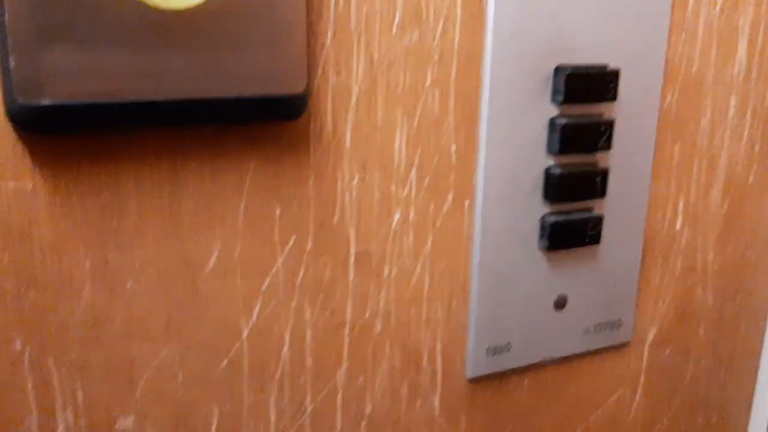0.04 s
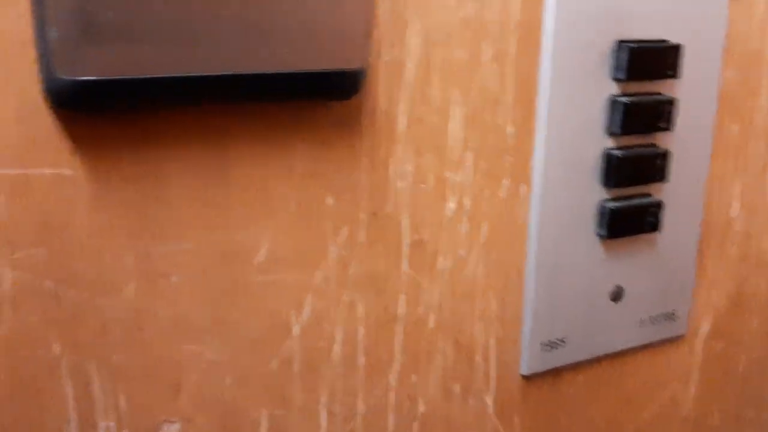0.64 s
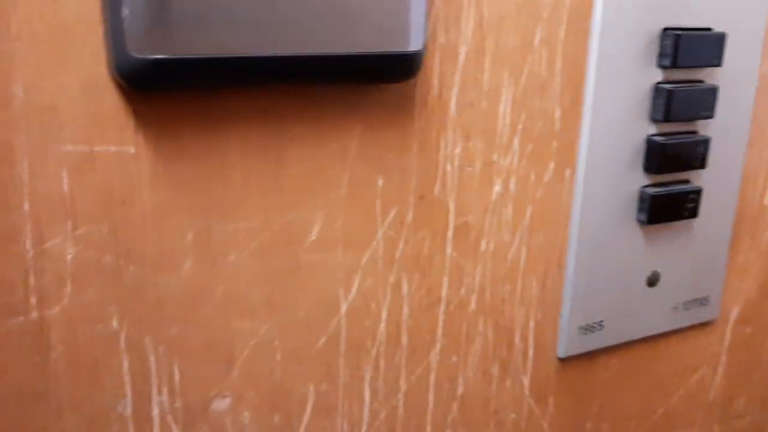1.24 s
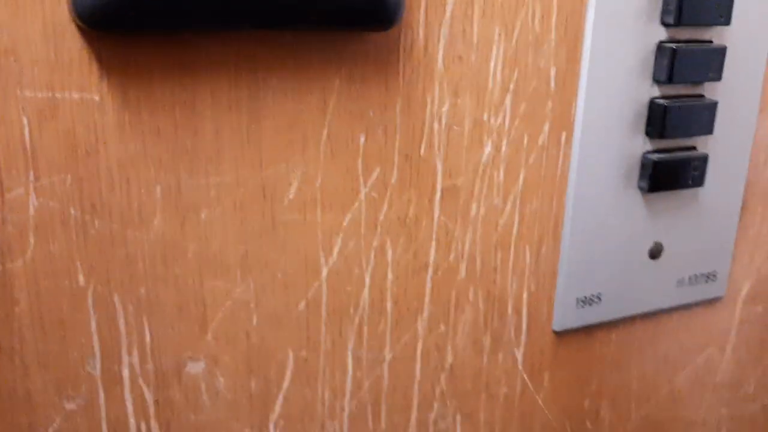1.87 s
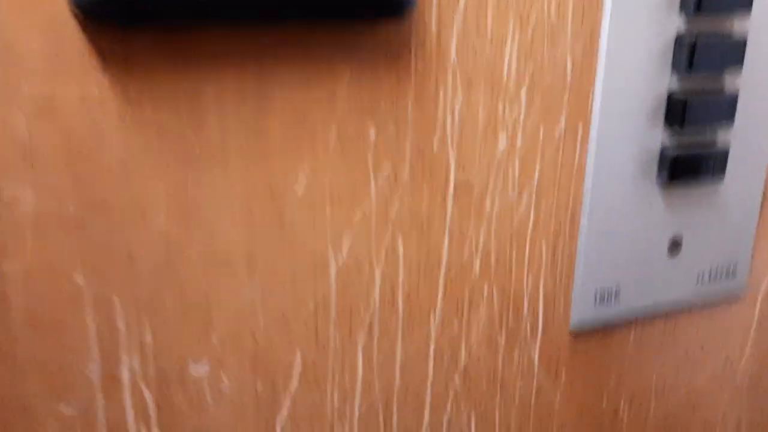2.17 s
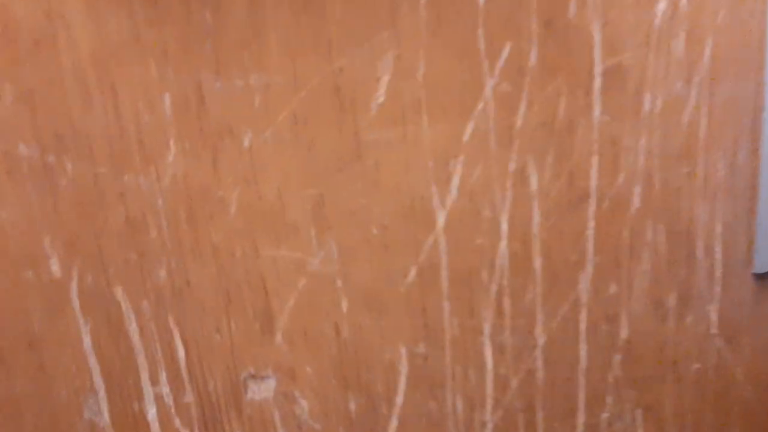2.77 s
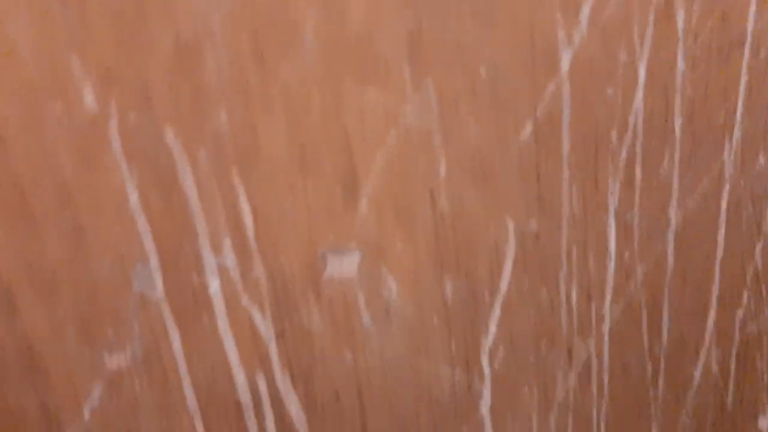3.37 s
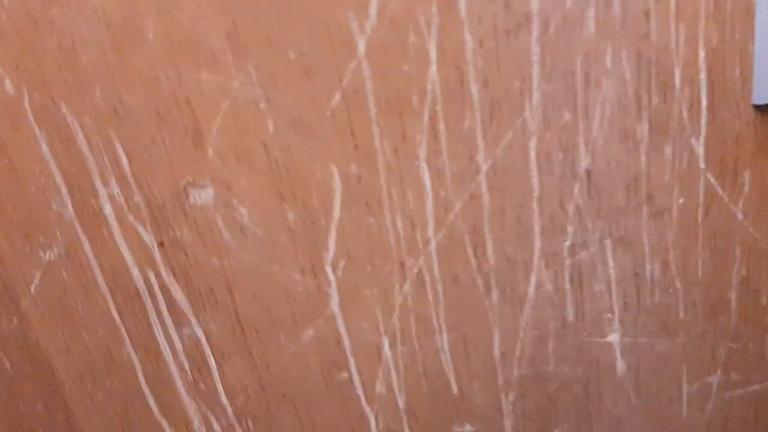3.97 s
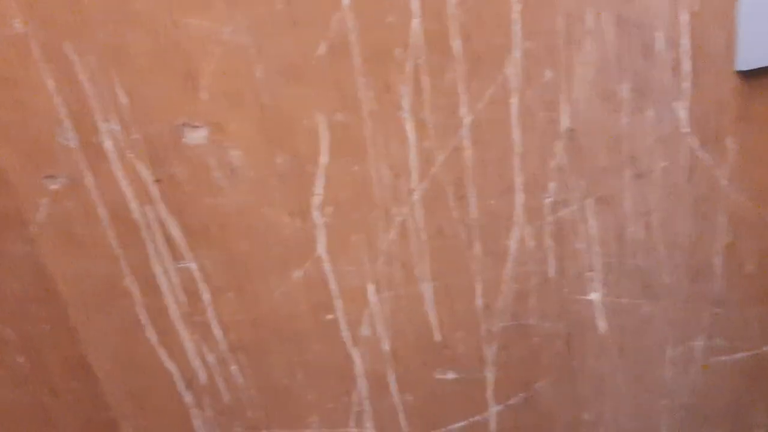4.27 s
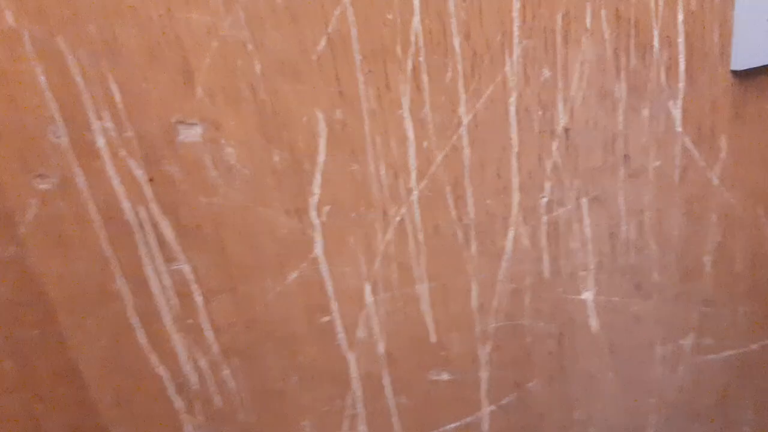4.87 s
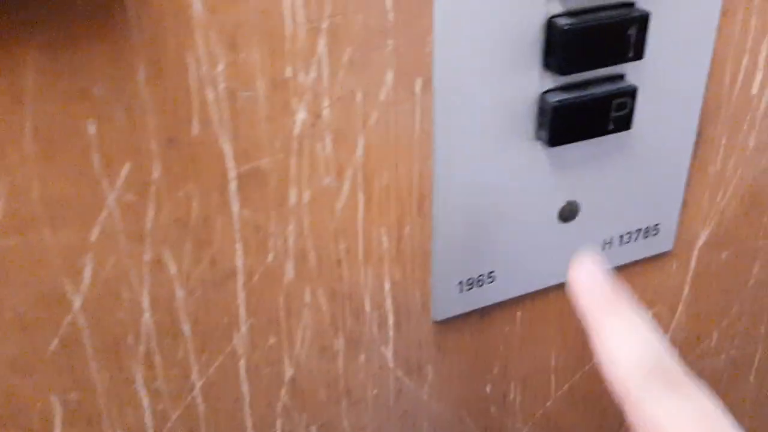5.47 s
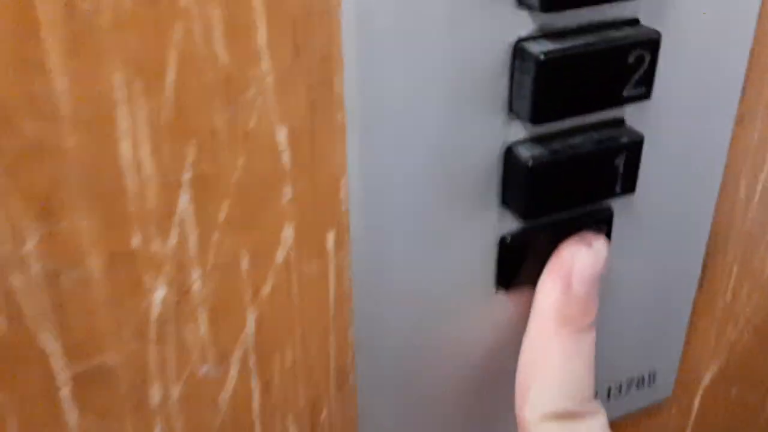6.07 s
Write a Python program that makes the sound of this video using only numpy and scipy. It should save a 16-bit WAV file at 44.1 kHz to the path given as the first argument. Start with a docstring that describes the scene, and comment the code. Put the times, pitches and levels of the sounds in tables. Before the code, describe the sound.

An old elevator hums and rumbles, then slams and thumps to a stop with metallic clicks, before a stiff button snaps.

```python
"""An old wood-panelled traction lift rides on the deep, beating hum of its machine, with a gear whine,
a rolling rumble and the hiss of its guide shoes. A lever scrapes and slams; the car thumps, bounces on
its ropes and slows, and steel latches click as it comes to rest, rubbing and groaning.
In the quiet a finger snaps a stiff floor button. Each blow is a tick, a clatter, a cabin echo and the
ring of the struck object; each rub is coloured noise combed by the cabin."""
import sys
import numpy as np
from scipy import signal
from scipy.fft import rfft, irfft
from scipy.io import wavfile
from scipy.ndimage import uniform_filter1d

SR = 44100
rng = np.random.default_rng(int(sys.argv[2]) if len(sys.argv) > 2 else 0)


def transcribe(u):
    """Save the signal u as a 16-bit wav file named by the first command-line argument.

    u: samples, shape (n,) or (channels, n), limited to [-1, 1]; the rate is SR.
    q: integer samples, one column per channel.
    """
    v = np.clip(np.atleast_2d(u).T, -1, 1)
    q = np.round(v * 32767).astype(np.int16)
    wavfile.write(sys.argv[1], SR, q)


N = 270333
TIME = np.arange(N) / SR
RING_TIME = TIME[:SR]  # one second for a blow to ring out


def amp(db):
    """Decibels to gain."""
    return 10 ** (np.asarray(db) / 20)


def unit_rms(x):
    """Scales to unit rms."""
    return x / np.sqrt(np.mean(x ** 2) + 1e-20)


def at_hz(points, hz):
    """Reads a table on a log-frequency axis."""
    freqs, values = np.transpose(points)
    return np.interp(np.log(hz + 1), np.log(freqs + 1), values)


def automation(points):
    """Draws a (time, value) table along the scene."""
    return np.interp(TIME, *np.transpose(points))


def add(mix, start, sound):
    """Mixes a sound in at start seconds."""
    part = mix[:, round(start * SR):][:, :sound.shape[-1]]
    part += sound[..., :part.shape[-1]]


def equalise(x, eq, size=8192):
    """Minimum-phase filter with the given (Hz, dB) shape."""
    log_gain = np.log(amp(at_hz(eq, abs(np.fft.fftfreq(size, 1 / SR)))))
    response = np.exp(np.conj(signal.hilbert(log_gain)))
    taps = np.fft.ifft(response).real[:size // 2]
    return signal.fftconvolve(x, taps[None], axes=1)[:, :x.shape[1]]


def wander(rate_hz):
    """Smooth random modulation of unit rms."""
    low_pass = np.exp(-(np.fft.rfftfreq(N, 1 / SR) / rate_hz) ** 2)
    return unit_rms(irfft(rfft(rng.standard_normal(N)) * low_pass, N))


def decay(t60):
    """Envelope that falls 60 dB in t60 seconds."""
    return np.exp(-np.log(1000) * RING_TIME / t60)


def onset(rise):
    """Fade-in with a time constant of rise seconds."""
    return 1 - np.exp(-RING_TIME / rise)


def swells(cues, attack, fade_db):
    """Gain of cues that build in attack seconds, hold for their length, then lose fade_db a second."""
    power = np.zeros(N)
    for start, length, db in cues:
        age = np.maximum(TIME - start, 0)
        held = amp(db - fade_db * np.maximum(age - length, 0))
        power += ((1 - np.exp(-age / attack)) * held) ** 2
    return np.sqrt(power)


# stereo width in the cabin: (frequency [Hz], side over mid [dB])
WIDTH = [(60, -26.5), (110, -18), (170, -10), (300, -7), (550, -5), (1000, 1.5), (2000, 0), (4000, -0.5),
         (12000, 0)]


def stereo(mid_side, left_db):
    """Bass is alike in both ears, treble arrives from all walls."""
    mid, side = mid_side
    side = irfft(rfft(side) * amp(at_hz(WIDTH, np.fft.rfftfreq(N, 1 / SR))), N)
    return np.array([(mid + side) * amp(left_db / 2), (mid - side) * amp(-left_db / 2)])


# reverb time of the cabin: (frequency [Hz], t60 [s])
CABIN_DECAY = [(100, 0.48), (260, 0.9), (700, 0.68), (1800, 0.52), (4800, 0.6), (12000, 0.11)]


def reflections():
    """Dense echoes between the cabin walls, each band dying at its own speed."""
    hz, t, bands = signal.stft(rng.standard_normal((2, SR)), SR, nperseg=256)
    fade = amp(-60 * t / at_hz(CABIN_DECAY, hz)[:, None])
    return signal.istft(bands * fade, SR)[1][:, :SR]


def ring(modes, rise):
    """Damped modes swell as a blow spreads through the object; mid and side are a quarter cycle apart."""
    side_shift = np.array([[0], [np.pi / 2]])
    tone = np.zeros((2, SR))
    for hz, db, t60 in modes:
        phase = 2 * np.pi * (hz * RING_TIME + rng.random()) + side_shift * rng.choice([-1, 1])
        tone += amp(db) * decay(t60) * np.sin(phase)
    return tone * onset(rise)


def contact_eq(db, centre_hz, below_db, above_db):
    """EQ of a blow: octave level peaks at the centre and falls by below_db and above_db an octave."""
    hz = np.array([20, centre_hz, SR / 2])
    octaves = np.log2(hz / centre_hz)
    octave_db = db + np.minimum(below_db * octaves, -above_db * octaves)
    white_to_pink_db = 10 * np.log10(SR / (2 * np.log(2) * hz))
    return np.transpose([hz, octave_db + white_to_pink_db])


def blows(hits, modes, rise, slopes_db, tick_db, grain_db, cabin_db, left_db):
    """Each blow is a sharp tick, a clatter of loose parts, a cabin echo and the struck object's ring."""
    out = np.zeros((2, N))
    for start, db, centre_hz, t60, ring_db in hits:
        roughness = unit_rms(uniform_filter1d(rng.standard_normal(SR), size=30))
        grains = unit_rms(amp(grain_db * roughness))
        clatter = rng.standard_normal((2, SR)) * grains * decay(t60) * onset(rise)
        clatter[0, 0] += amp(tick_db)
        echo = amp(cabin_db) * reflections() * onset(0.012)
        impact = equalise(clatter + echo, contact_eq(db, centre_hz, *slopes_db))
        add(out, start, impact + amp(ring_db) * ring(modes, 2 * rise))
    return stereo(out, left_db)


def friction(gain, eq, flutter_db, flutter_hz, left_db):
    """Uneven rubbing, heard partly direct and partly combed by the cabin's standing waves."""
    force = rng.standard_normal(N + SR)
    walls = reflections() * decay(0.3)
    combed = unit_rms(signal.fftconvolve(force[None], walls, axes=1)[:, SR:SR + N])
    direct = rng.standard_normal((2, N))
    sound = equalise(combed + direct, eq) * amp(flutter_db * wander(flutter_hz))
    sound = np.array([unit_rms(channel) for channel in sound])
    return stereo(sound * gain, left_db)


# tone of the quiet bed: (frequency [Hz], relative level [dB])
FLOOR_EQ = [(30, -14.5), (60, 1), (110, -2.5), (200, -19.5), (400, -28), (1000, -34.5), (2000, -34.5),
            (3500, -40), (5200, -38.5), (9000, -50.5), (12000, -36.5), (15500, -39)]


def noise_floor(level_db=-68):
    """A faint, steady, bass-heavy bed of noise."""
    noise = equalise(rng.standard_normal((2, N)), FLOOR_EQ)
    return amp(level_db) * unit_rms(stereo(noise, left_db=1))


# cues for the car's shudders, sways and groans: (start [s], length [s], level [dB])
SHUDDERS = [(1.65, .08, -29.5), (1.74, 0.034, -16.5), (1.885, 0.031, -22.5), (3.15, 0.22, -48.5),
            (3.68, 0.11, -39), (4.05, .2, -49.5), (5.85, .03, -42)]
SWAYS = [(3.25, .4, -52), (3.72, 0.13, -51), (4.2, 0.055, -50), (5.0, 0.083, -58), (5.38, 0.065, -54.5),
         (5.88, 0.1, -48)]
GROANS = [(3.51, 0.012, -51.5), (3.6, 0.11, -46.5), (3.69, 0.06, -43.5)]
# tone of each: (frequency [Hz], relative level [dB])
SHUDDER_EQ = [(25, -21.5), (45, 7.5), (65, 8.5), (80, -0.5), (100, 1), (122, -8.5), (150, -13), (180, -2),
              (230, -19), (275, -11.5), (310, -28.5), (400, -18), (900, -74)]
SWAY_EQ = [(25, -35), (40, 3.5), (52, -1), (64, 6), (90, -18), (200, -46)]
GROAN_EQ = [(150, -44), (300, 7.5), (400, 1.5), (470, 7), (600, -25), (1200, -38)]


def car_settling():
    """The car body shudders, sways on its ropes once stopped and groans low as it settles."""
    shudder = friction(swells(SHUDDERS, attack=0.01, fade_db=85.5), SHUDDER_EQ,
                       flutter_db=0.17, flutter_hz=6, left_db=2)
    sway = friction(swells(SWAYS, attack=0.012, fade_db=50.5), SWAY_EQ,
                    flutter_db=5.5, flutter_hz=5, left_db=5)
    groan = friction(swells(GROANS, attack=0.01, fade_db=130), GROAN_EQ,
                     flutter_db=0, flutter_hz=40, left_db=1)
    return shudder + sway + groan


# cues for the guide shoes' rubbing and singing: (start [s], length [s], level [dB])
RUBS = [(1.87, 0.1, -44), (2.04, 0.42, -50), (2.5, 0.31, -61), (2.77, 0.11, -47), (3.05, .04, -45),
        (3.425, 0.026, -57.5), (3.55, 0.14, -66.5), (3.73, 0.13, -49.5), (4.04, 0.1, -59),
        (5.08, 0.23, -81)]
SINGS = [(3.42, 0.032, -65), (3.88, 0.13, -65), (4.08, 0.15, -72), (4.63, 0.036, -81), (5.07, 0.059, -73),
         (5.2, 0.13, -79)]
# tone of each: (frequency [Hz], relative level [dB])
RUB_EQ = [(100, 3.5), (250, 11.5), (450, 7.5), (700, -1.5), (1100, -4), (1550, -1), (1800, -8), (2060, 2.5),
          (2300, -5.5), (2700, -9), (3300, -15.5), (5200, -12), (7500, -22), (15000, -14)]
SING_EQ = [(1200, -59), (1750, -18), (1860, -3), (1950, -9), (2050, -2), (2150, -9.5), (2300, -23),
           (3200, -37), (4300, -20), (5300, -15.5), (6500, -23), (9000, -23)]


def shoe_rubs():
    """Guide shoes rub and sing thinly on their rails as the car creeps and settles."""
    rub = friction(swells(RUBS, attack=0.009, fade_db=107.5), RUB_EQ,
                   flutter_db=2.1, flutter_hz=35.53, left_db=1.5)
    sing = friction(swells(SINGS, attack=0.015, fade_db=57), SING_EQ,
                    flutter_db=1, flutter_hz=25.07, left_db=7)
    return rub + sing


# latch and contact hits, with the lever's release at 1.563 s among them: (time [s], octave level [dB], centre
# [Hz], clatter t60 [s], ring [dB])
LATCH_HITS = [(.523, -48, 10300, 0.13, -49), (1.052, -46.5, 8700, 0.27, -73),
              (1.225, -44.5, 4700, .55, -68), (1.563, -24.5, 1500, .06, -50),
              (1.885, -48.5, 12000, 0.39, -67), (2.704, -55, 11400, 0.35, -62),
              (2.76, -62, 3400, 0.33, -59), (2.999, -31, 7560, 0.18, -48), (3.040, -34, 5040, 0.14, -31.5),
              (3.698, -49, 13300, 0.39, -54.5), (3.954, -38, 5100, 0.11, -47),
              (4.121, -56.5, 7100, 0.14, -77), (5.268, -73, 5500, 0.14, -92)]
# ring of the steel: (frequency [Hz], level [dB], t60 [s])
LATCH_MODES = [(410, -6.5, .35), (1530, 0.5, .14), (1576, 0.5, 0.1), (1460, -23.5, 1), (1660, -23, 0.37),
               (1880, -1, 0.068), (2050, -4, .2), (2118, 6, .06), (2330, -5.5, 0.21), (2440, -5.5, 0.072),
               (3713, -19.5, .19), (5800, -23, .2), (7010, -19.5, 0.28)]


def latch_clicks():
    """Latches and contacts snap with a bright, steely ring; among them the lever releases at 1.563 s."""
    return blows(LATCH_HITS, LATCH_MODES, rise=0.0014, slopes_db=(5.5, 7),
                 tick_db=15, grain_db=3.5, cabin_db=-20, left_db=1.5)


# hits on button and wall: (time [s], octave level [dB], centre [Hz], clatter t60 [s], ring [dB])
BUTTON_HITS = [(5.8445, -23.5, 6900, .027, -64.5), (5.847, -18.5, 5440, 0.18, -46),
               (5.8517, -17.5, 5300, 0.13, -33), (5.8712, -15.5, 5900, 0.049, -52),
               (5.8737, -15.5, 7530, 0.015, -50)]
WALL_HITS = [(5.88, -31.5, 2500, 0.11, -26)]
# ring of the button plate and of the wood: (frequency [Hz], level [dB], t60 [s])
PLATE_MODES = [(626, 0, 0.39), (950, -9, 0.62), (1151, -9, 0.41), (1496, -2.5, 0.27), (2696, 1, 0.34),
               (2830, -7.5, .35), (3730, 7, 0.24), (3800, -1, 0.21), (3920, 6, 0.24), (4150, -7, 0.3),
               (4550, -4, 0.26), (4570, -6, 0.22), (5050, -3, 0.26), (5200, -5.5, .25), (5238, -6, .3),
               (6000, -13, 0.21), (6912, -15, 0.13), (7300, 3, .2)]
WALL_MODES = [(235, -4, 0.28), (276, -3.5, 0.22), (339, -11, 0.19), (360, -0.5, 0.13), (476, -13, 0.31)]


def floor_button():
    """The button snaps over and hits its stop; the finger shoves the wooden wall with it."""
    snap = blows(BUTTON_HITS, PLATE_MODES, rise=0.00019, slopes_db=(6, 1),
                 tick_db=10, grain_db=2.5, cabin_db=-15.5, left_db=2.5)
    shove = blows(WALL_HITS, WALL_MODES, rise=0.0019, slopes_db=(4.5, 5),
                  tick_db=2, grain_db=-11, cabin_db=-3.5, left_db=2)
    return snap + shove


# scrapes leading into the slam: (start [s], length [s], level [dB])
SCRAPES = [(1.582, 0.06, -26.5), (1.617, .07, -23.5)]
# tone of the scrape: (frequency [Hz], relative level [dB])
SCRAPE_EQ = [(80, -3.5), (190, 1), (280, -11), (420, 4.5), (650, -1), (1100, 0.5), (1700, -2), (2200, -3),
             (3000, -11.5), (5000, -5.5), (7500, -15.5), (15000, -10.5)]
# hits of the slam: (time [s], octave level [dB], centre [Hz], clatter t60 [s], ring [dB])
LEVER_HITS = [(1.626, -24.5, 2500, 0.095, -32.5), (1.711, -22, 1400, 0.14, -18.5),
              (1.724, -23.5, 9000, 0.14, -28.5)]
# ring of the lever and its bracket: (frequency [Hz], level [dB], t60 [s])
LEVER_MODES = [(391.6, -5.5, 0.28), (472.7, -1, 0.25), (494, 0.5, 0.44), (853, -6.5, 0.25),
               (973, -6.5, 0.22), (1741, -8.5, 0.41), (2052, -1, 0.19), (2179, -3.5, 0.19),
               (2256, -1, 0.063), (2430, -5, 0.073), (4188, -18, 0.23), (4580, -13.5, 0.18)]


def lever():
    """The lever scrapes, then slams home and rings with its bracket."""
    scrape = friction(swells(SCRAPES, attack=0.004, fade_db=237), SCRAPE_EQ,
                      flutter_db=0.5, flutter_hz=120, left_db=2.5)
    slam = blows(LEVER_HITS, LEVER_MODES, rise=0.001, slopes_db=(1.15, 5.5),
                 tick_db=10.5, grain_db=2, cabin_db=-17, left_db=2.5)
    return scrape + slam


# thumps on the car: (time [s], octave level [dB], centre [Hz], clatter t60 [s], ring [dB])
CAR_HITS = [(1.118, -40.5, 1556, 0.39, -46), (1.754, -23, 420, 0.72, -26), (1.881, -16.5, 306, 0.16, -15.5),
            (2.034, -42.5, 1300, 0.52, -50), (2.961, -33.5, 367, 0.36, -39.5), (3.412, -59, 190, 0.11, -41),
            (3.513, -56, 504, .07, -50.5), (3.688, -35, 330, .28, -39.5), (3.728, -38, 680, 0.65, -41),
            (3.759, -42, 1220, 0.25, -54.5), (3.875, -41.5, 220, 0.14, -44), (4.222, -62.5, 400, .13, -67),
            (4.643, -67, 900, .11, -62.5), (5.272, -70.5, 499, .06, -91)]
# boom of the car body: (frequency [Hz], level [dB], t60 [s])
CAR_MODES = [(65.14, -10, 0.85), (104, -5.5, 0.23), (169.9, 7, .25), (243.7, -5, .55), (319.7, -15.5, .4),
             (396.2, -14, 0.35), (513, -14.5, 0.25), (623, -22, .28), (747, -26.5, .28), (835.4, -23, 0.36)]


def car_knocks():
    """Dull blows travel through the car and set its body ringing."""
    return blows(CAR_HITS, CAR_MODES, rise=0.0031, slopes_db=(3.5, 9.5),
                 tick_db=12, grain_db=1.5, cabin_db=-23.5, left_db=1.5)


# jolts on the ropes: (time [s], level [dB], floor flex trim [dB])
JOLTS = [(1.656, -20, 1.5), (1.747, -12.5, 1.5), (1.993, -18, -2.5), (2.158, -26.5, -3), (3.758, -23, -19),
         (3.867, -30.5, -12.5), (4.251, -50, -7)]
# their low end, rope bounce then floor flex: (frequency [Hz], level [dB], t60 [s])
SUSPENSION_MODES = [(47, -8, 0.69), (98.1, 2, 0.38)]


def rope_jolts():
    """The whole car bounces on its ropes; a hard jolt flexes the floor too."""
    out = np.zeros((2, N))
    bounce, flex = [amp(db) * decay(t60) * np.sin(2 * np.pi * hz * RING_TIME)
                    for hz, db, t60 in SUSPENSION_MODES]
    for start, db, flex_db in JOLTS:
        add(out, start, amp(db) * (bounce + amp(flex_db) * flex) * onset(0.002))
    return out


# the car runs, brakes to a creep and stops: (time [s], speed [share of full])
SPEED = [(0, 0.99), (1.822, 0.96), (2.08, 0.59), (3.05, 0.34), (3.251, 0)]


def speed():
    """Share of full speed; after the last point the brake holds the car still."""
    return automation(SPEED)


# fader ride of the shoe hiss: (time [s], relative level [dB])
HISS_FADER = [(0.0, -53.5), (0.626, -56.5), (0.934, -54.5), (1.1, -55), (1.274, -52.5), (1.37, -55.5),
              (1.52, -55.5)]
# tone of the hiss and of the rolling: (frequency [Hz], relative level [dB])
HISS_EQ = [(100, 0), (250, 8), (350, 3), (450, 1), (700, 0), (1600, 3), (2150, 1), (2500, -3), (2800, 0),
           (3100, -4), (4200, -3), (5200, -1), (5750, -8), (7500, -11), (15000, -15)]
ROLL_EQ = [(25, -22.5), (45, -0.5), (65, 4), (80, -1), (100, 2.5), (122, -1.5), (155, -4), (185, -4.5),
           (230, -14), (275, -7), (310, -24), (400, -21.5), (900, -71)]


def shaft_travel():
    """The car rolls and its guide shoes hiss; as it slows, the hiss dies well before the rumble."""
    roll_gain = amp(-33) * speed() ** 0.97
    hiss_gain = amp(11.5 + automation(HISS_FADER)) * speed() ** 5.5
    roll = friction(roll_gain, ROLL_EQ, flutter_db=3.07, flutter_hz=7, left_db=2.5)
    hiss = friction(hiss_gain, HISS_EQ, flutter_db=0.83, flutter_hz=28, left_db=3)
    return roll + hiss


# partials of the whine: (frequency [Hz], relative level [dB])
WHINE_PARTIALS = [(269.2, -2), (538.5, 0)]
# its fader ride: (time [s], relative level [dB])
WHINE_FADER = [(0.0, -68), (0.31, -77), (0.366, -63.5), (0.804, -55.5), (0.958, -68), (1.068, -54.5),
               (1.53, -56.5)]


def gear_whine(waver=0.0007):
    """The gear sings at a slightly wavering pitch and fades steeply as the car slows."""
    phase_per_hz = 2 * np.pi * np.cumsum(1 + waver * wander(10)) / SR
    tone = sum(amp(db) * np.sin(hz * phase_per_hz) for hz, db in WHINE_PARTIALS)
    return tone * amp(10 + automation(WHINE_FADER)) * speed() ** 5


# the motor's fast run, then its slow run:
# (start [s], length [s], level [dB], growth [dB/s], hum [Hz], beat [Hz], time of one crest [s])
MOTOR_RUNS = [(0, 1.996, -29.5, 1.5, 49.12, 4.2, .24), (2.127, 0.95, -27, -4.5, 45.96, 6.35, 2.35)]


def motor_hum(beat_db=-4, octave_db=-17, drift_rad=0.1, unsteady_db=1):
    """Two close vibrations of the machine beat through the ropes, under a faint octave."""
    hum = np.zeros(N)
    for start, length, db, growth_db, hum_hz, beat_hz, crest in MOTOR_RUNS:
        phase = 2 * np.pi * hum_hz * TIME + drift_rad * wander(9)
        beat = 2 * np.pi * beat_hz * (TIME - crest)
        tone = np.sin(phase) + amp(beat_db) * np.sin(phase + beat) + amp(octave_db) * np.sin(2 * phase)
        envelope = swells([(start, length, db)], attack=0.0027, fade_db=117)
        hum += tone * envelope * amp(growth_db * (TIME - start))
    return hum * amp(unsteady_db * wander(12))


def scene():
    """The ride, the stop and the button."""
    hits = lever() + car_knocks() + latch_clicks() + floor_button()
    machine = np.sqrt(2) * (motor_hum() + gear_whine()) * amp([[0.3], [-0.3]])  # a touch to the left
    car = shaft_travel() + car_settling() + shoe_rubs() + rope_jolts()
    return machine + car + hits


# response of the microphone: (frequency [Hz], gain [dB])
MICROPHONE_EQ = [(20, -13), (40, -4.5), (7600, -5), (8200, -16.5), (8700, -22.5), (10000, -14),
                 (12000, -11), (15500, -12.5)]


def record(dry):
    """A small microphone with a dull top, a faint noise floor and a 15.9 kHz band limit."""
    heard = equalise(dry, MICROPHONE_EQ) + noise_floor()
    low_pass = signal.firwin(511, 15900, window=("kaiser", 9), fs=SR)
    return signal.oaconvolve(heard, low_pass[None], "same")


dry = scene()
out = record(dry)
transcribe(out)
```